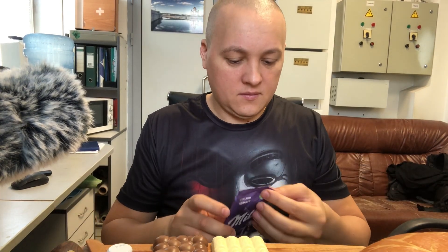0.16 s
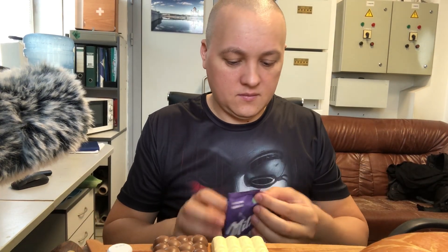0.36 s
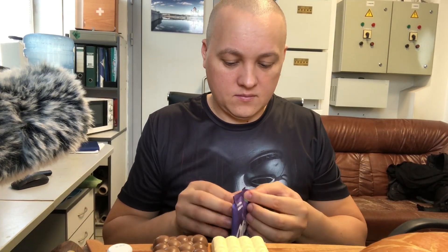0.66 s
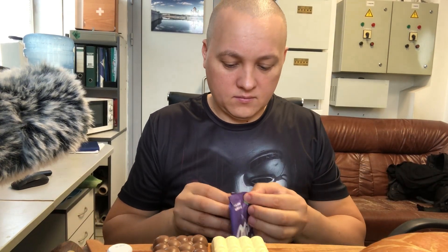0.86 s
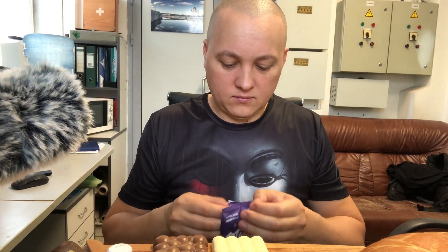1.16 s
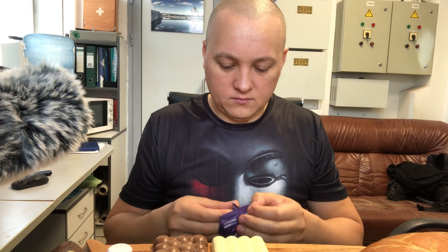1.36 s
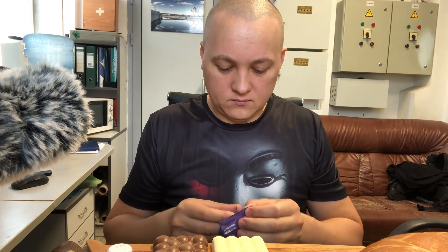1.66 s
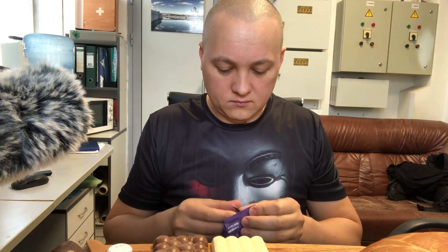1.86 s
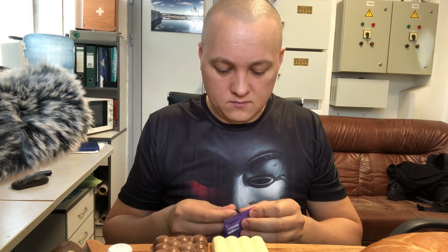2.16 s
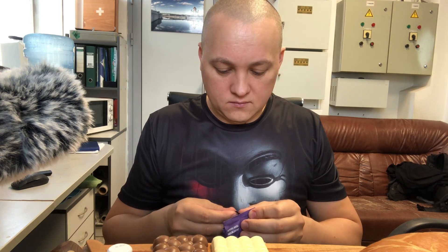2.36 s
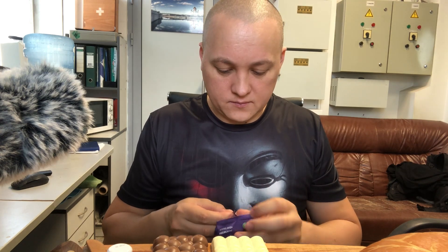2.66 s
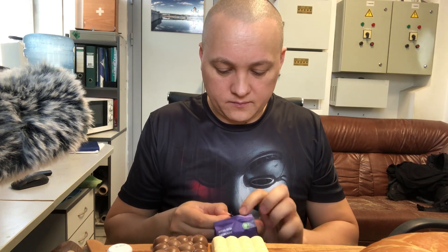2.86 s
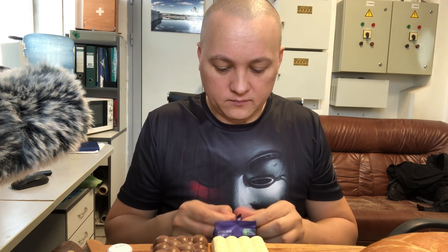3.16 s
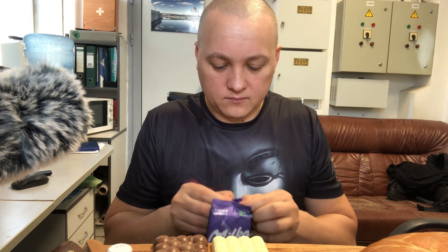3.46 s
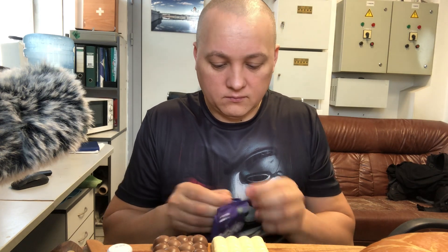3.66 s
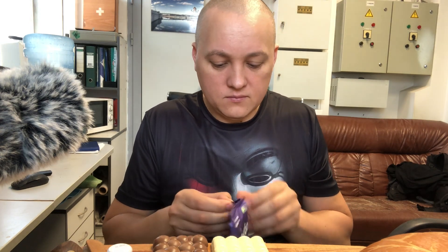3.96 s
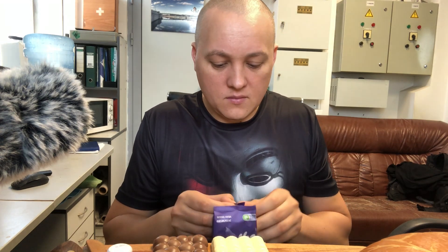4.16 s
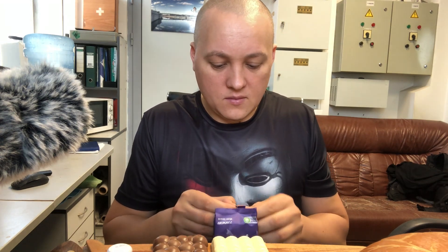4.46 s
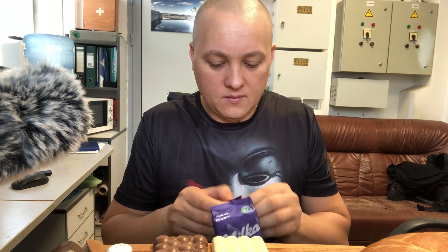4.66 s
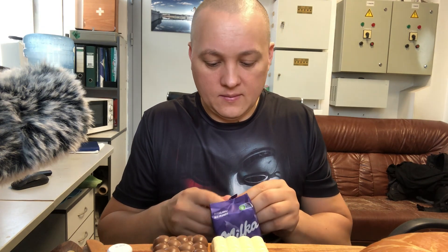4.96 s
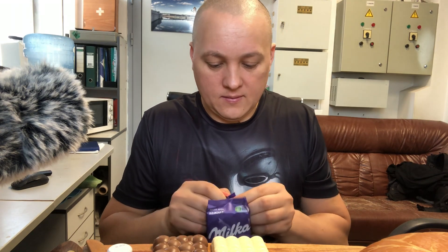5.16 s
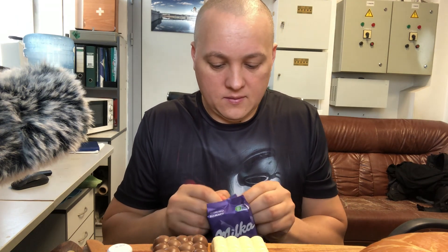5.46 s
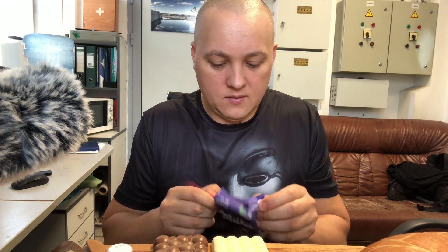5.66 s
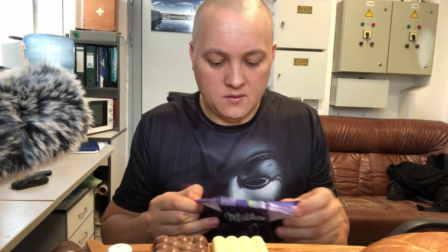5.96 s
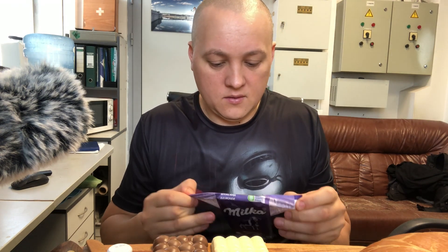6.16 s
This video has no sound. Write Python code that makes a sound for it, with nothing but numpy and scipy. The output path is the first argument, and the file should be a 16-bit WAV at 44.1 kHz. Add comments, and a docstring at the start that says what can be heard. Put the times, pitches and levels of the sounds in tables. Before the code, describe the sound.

A foil and paper chocolate wrapper crackles in irregular sharp snaps, then tears open in two dense bursts, over a low indoor machine hum.

```python
"""A foil and paper chocolate wrapper is opened by hand close to a microphone in a small furnished room.
Creases snap as shaped pulses with a crackling end, and the seam tears in two bursts of dense cracks.
Fingers rustle and swipe the film as filtered grains; the bar knocks as short pairs of decaying tones.
Machines hum as wavering multiples of their shaft rates, under the soft filtered noise of the air."""
import sys
import numpy as np
from scipy import signal
from scipy.fft import rfft, irfft
from scipy.io import wavfile
from scipy.ndimage import uniform_filter1d

SR = 44100
rng = np.random.default_rng(int(sys.argv[2]) if len(sys.argv) > 2 else 0)


def persist_wave(psi):
    """Save psi, clipped to +-1, as 16-bit WAV."""
    counts = np.round(np.clip(psi, -1, 1) * 32767).astype(np.int16)
    wavfile.write(sys.argv[1], SR, np.atleast_2d(counts).T)


N = 277830  # length in samples

# Fingers sliding on the film. Each row: time in seconds, level in dB; the level glides between rows.
RUSTLE_LEVELS = [(0, -60.5), (.3, -69.5), (.62, -74), (.75, -70), (1.0, -66), (1.3, -69.5), (1.8, -69.5),
                 (2.1, -72.5), (2.36, -81), (2.52, -67), (2.95, -67.5), (3.2, -72), (3.5, -64), (3.85, -77),
                 (4.1, -64), (4.5, -67), (5.05, -63.5), (5.2, -67), (5.62, -60.5), (5.7, -52.5), (6.0, -50),
                 (6.3, -71)]

# Humming machines. Each row: base rate in Hz, lowest heard multiple of it. The base rate is the shaft rate,
# except in the last row, where it is twice the shaft rate of a machine heard only through that tone.
SHAFTS = [(14.81, 3), (13.39, 5), (47.1, 1), (170.3, 1)]
# Each row: mean levels in dB of one machine's successive multiples, from its lowest heard one.
HUM_LEVELS_DB = [
    [-76.5, -87, -67, -66.5, -67.5, -81, -65, -55, -52.5, -63.5, -55.5, -92, -72, -71.5, -74, -72.5, -72,
     -73, -67.5],
    [-67.5, -80, -64.5, -74, -60.5, -75, -64, -65, -68, -54, -77, -76],
    [-72.5, -62.5, -75, -63.5],
    [-57],
]
OVERTONE_DB, OVERTONE_TOP_HZ = -78, 895  # mean peak level and upper limit of the faint hum overtones

# Spectrum of the air noise. Each row: frequency in Hz, relative density in dB per Hz.
AIR_SPECTRUM = [(25, -30), (60, -33), (170, -0.5), (260, -12.5), (470, -9), (830, -18.5), (1050, -17),
                (1200, -28.5), (1550, -26), (2330, -27), (3810, -31), (4860, -47.5), (5800, -32),
                (6600, -51), (14800, -57), (17000, -61)]
AIR_DB = -55  # level before the slight swelling
WHINE_HZ, WHINE_WIDTH_HZ, WHINE_DB = 3800, 130, -76  # narrow hiss of a small fan

# Crease snaps. Each row: start in seconds, crack level in dB over SNAP_S, crack pitch in Hz,
# breadth of the crack's peak in octaves, level in dB of the bar's low ring (both before film boosts and fold cut).
CREASE_SNAPS = [(0.0545, -35, 5800, 2.8, -38), (0.0775, -47, 3400, 1.2, -57),
                (0.1035, -35.5, 3700, 0.18, -40), (0.1181, -42, 4900, 1.8, -42),
                (0.1517, -34, 8900, 2.5, -40), (0.3625, -46, 6100, 0.1, -55), (0.3786, -45, 3700, 2.7, -47),
                (0.3847, -28, 7600, 0.59, -50), (0.6669, -48.5, 5430, 0.1, -74),
                (0.6712, -52, 4400, 0.8, -58), (0.7033, -48.5, 7000, 1.3, -68),
                (0.7816, -43.5, 5800, 0.1, -53), (0.7861, -43.5, 3220, 0.1, -45.5),
                (0.8975, -28, 4000, 2.1, -73), (0.9536, -46, 5200, 0.87, -60), (0.9805, -33, 4400, 1, -34),
                (1.0258, -42.5, 2420, 1.4, -58), (1.0702, -41.5, 3740, 0.082, -52),
                (1.1328, -53, 2300, 2.7, -46), (1.3391, -34.5, 5730, 2.5, -49),
                (1.3486, -35.5, 4340, 0.58, -42), (1.6907, -27, 6470, 0.1, -44.5),
                (1.816, -44.5, 2520, 0.5, -67), (1.9069, -37.5, 3400, 1.15, -38.5),
                (2.382, -38.5, 4600, 1.3, -44.5), (2.506, -33.5, 5200, 0.22, -40),
                (2.513, -39, 4600, 2.8, -42), (2.5195, -39.5, 4330, 0.1, -59),
                (2.6537, -49, 4200, 0.2, -43.5), (2.666, -45.5, 2300, 3.5, -52),
                (2.8068, -42.5, 2300, 1, -37.5), (2.8649, -38, 2400, 2.5, -40),
                (2.9207, -58, 3200, 0.2, -39), (2.9253, -36.5, 5070, 0.069, -43),
                (3.0087, -28.5, 7700, 1.4, -37.5), (3.0351, -48, 2300, 1.2, -43),
                (3.2727, -44, 3300, 0.1, -46.5), (3.3684, -36, 4000, 1.1, -38),
                (3.4184, -49, 2900, 0.5, -45), (3.4218, -38.5, 3000, 1.5, -40.5),
                (3.4317, -37, 5770, 1.4, -70), (3.4766, -40, 2400, 2.2, -35.5),
                (3.483, -41, 6100, 0.1, -39), (3.4906, -33.5, 2400, 2.1, -41),
                (3.5148, -46, 2400, 2, -44.5), (3.5509, -43.5, 2740, 0.1, -45),
                (3.5655, -34, 4500, 0.42, -53), (3.5685, -47, 3200, 0.32, -48),
                (3.6338, -32.5, 7840, 0.56, -49), (3.6795, -41.5, 3000, 1.2, -56),
                (3.7231, -42.5, 4900, 0.54, -59), (3.735, -48, 3400, 0.5, -44),
                (3.9275, -49.5, 4900, 1.2, -55), (3.9517, -42.5, 6600, 0.1, -59),
                (4.0467, -52, 7100, 0.1, -51), (4.091, -44, 4380, 1.1, -50), (4.0972, -47, 3900, 1.2, -45),
                (4.105, -42.5, 4400, 1.1, -48), (4.2023, -35.5, 3770, 1.8, -41.5),
                (4.3157, -42.5, 3570, 0.35, -67), (4.469, -39.5, 2700, 0.1, -42.5),
                (4.6163, -54, 2300, 2.5, -44), (4.6244, -32.5, 5200, 2.7, -45),
                (4.6669, -22.5, 3380, 3, -33), (4.7717, -34, 3480, 0.16, -33),
                (4.8826, -42, 5130, 0.18, -58), (4.9464, -32, 2300, 1, -36.5), (4.985, -48, 2300, 0.5, -53),
                (5.0126, -36.5, 4740, 0.1, -46), (5.0384, -45, 3900, 0.35, -50),
                (5.0523, -42, 4400, 1.1, -56), (5.0576, -28, 3500, 1.8, -36.5),
                (5.082, -41, 3700, 0.8, -47), (5.3617, -53.5, 6400, 0.1, -66), (5.422, -36, 2600, 2.5, -42),
                (5.434, -40, 6100, 1.2, -47), (5.441, -25, 2300, 2, -56), (5.446, -42, 4600, 0.35, -36),
                (5.4474, -24, 3600, 0.8, -36), (5.453, -26.5, 6100, 2.5, -26),
                (5.4585, -36, 5500, 2.5, -30), (5.4637, -24.5, 6100, 1.8, -29),
                (5.4755, -25, 3440, 0.1, -36), (5.4814, -26, 2350, 0.1, -38),
                (5.4885, -30, 4380, 0.99, -22), (5.4949, -28, 2320, 0.1, -22.5),
                (5.5006, -32, 2300, 1.4, -32), (5.5106, -28, 2300, 1.3, -31), (5.5162, -30, 3200, 1.5, -21),
                (5.698, -47, 5200, 1.8, -57), (5.705, -38, 4370, 1, -53), (5.724, -41, 3950, 0.1, -51),
                (5.735, -38, 3900, 0.081, -44), (5.747, -37, 3400, 0.8, -45),
                (5.7637, -17, 4230, 0.65, -29.5), (5.8095, -40, 2400, 2.5, -39),
                (5.8278, -24.5, 4400, 0.35, -44), (5.843, -23, 5630, 0.58, -34),
                (5.8502, -30, 2300, 1.2, -26), (5.8637, -37, 2600, 0.1, -29),
                (5.8672, -25, 2300, 0.86, -22), (5.8748, -28, 2300, 2.2, -31),
                (5.8773, -26, 4900, 0.97, -20), (5.8857, -29, 3000, 2.5, -32), (5.897, -41, 2900, 0.1, -31),
                (5.902, -28, 2530, 0.1, -34), (5.9108, -25.5, 3700, 3.4, -25),
                (5.9181, -19, 3920, 1.3, -29), (5.9221, -22.5, 3800, 0.11, -33),
                (5.9305, -21.5, 3900, 2.1, -28), (5.9353, -31, 6400, 2.5, -36),
                (6.0981, -59, 2300, 0.1, -48), (6.1462, -41.5, 2300, 3.1, -41.5),
                (6.1763, -45, 4200, 1.4, -55), (6.1952, -38.5, 3700, 4.5, -42.5)]
SNAP_S = .003  # span in seconds over which a snap's level is counted
CRACK_BELOW_DB, CRACK_ABOVE_DB = 11.5, 17.5  # fall per octave away from the pitch
RING_HZ, RING_BELOW_DB, RING_ABOVE_DB, RING_TOP_OCT = 1526, 6, 17.5, 0.068  # same shape for the low ring
# Dull snaps (more ring than crack) crackle longer; stretch is a log factor per dB, spread is random.
CRACKLE_DECAY_MS, DULL_STRETCH, CRACKLE_SPREAD = 2.31, 0.037, 0.34
# Loud snaps are shorter (log factor per dB above -42.5), those inside a tear longer (log factor).
LOUD_SHRINK, TEAR_STRETCH = 0.018, 0.67
# Small folds radiate little bass: extra fall per octave below this, for three octaves.
FOLD_CUT_HZ, FOLD_CUT_DB = 1290, 11.5
# Modes of the wrapped bar. Each row: frequency in Hz, width in Hz, mean boost in dB.
FILM_MODES = [(1545, 59, 1), (2550, 180, 6), (3790, 170, 3), (5680, 440, 3), (7600, 1100, 3),
              (9830, 1400, 5)]

# Quick swipes of a fingertip over the film. Each row: time of the peak in seconds, peak level in dB.
SWIPES = [(.28, -63.5), (.57, -66), (.77, -60), (1.67, -64), (1.866, -58), (3.0, -58), (3.49, -53),
          (3.935, -63), (4.093, -60), (4.42, -60.5), (4.61, -57), (5.28, -70)]
SWIPE_S, SWIPE_LO_HZ, SWIPE_HI_HZ = .013, 3430, 14200  # spread of the swell, band of the swish

# The bar knocks against the fingers. Each row: start in seconds, level in dB, pitch in Hz.
KNOCKS = [(2.653, -44, 720), (2.806, -47, 730), (2.865, -40, 638), (3.421, -38.5, 755), (4.201, -33, 650),
          (4.623, -40.5, 630), (4.77, -40.5, 805), (5.054, -44, 784), (5.47, -32, 695), (5.836, -26, 570),
          (5.875, -27.5, 426), (5.911, -26.5, 755), (6.145, -31.5, 497), (6.176, -38.5, 490),
          (6.195, -36, 516)]
KNOCK_T60_S = 0.043

# Seam tearing. Each row: start in seconds, attack in seconds, hold in seconds, level in dB,
# thump in dB above the body, treble drift in dB per second.
TEARS = [(5.421, 0.037, 0.058, -40.5, 2, -110), (5.805, 0.065, 0.063, -38, 5.5, 58)]
# Edges in Hz of the four tear bands: thump, body, film, hiss.
TEAR_EDGES_HZ = [330, 1000, 2000, 6000, 14000]
TEAR_RISE_DB, TEAR_FALL_DB_S = 20, 600  # swell during the attack, fall per second after the hold
TEAR_FILM_DB, TEAR_HISS_DB = 3.5, -2.5  # against the body, before the treble drift

# Room decay. Each row: frequency in Hz, time in seconds to fall 60 dB.
ROOM_T60 = [(500, 0.34), (2000, 0.38), (6000, 0.36), (16000, 0.17)]
ROOM_DB = -12  # energy of the tail

# Resonances of the microphone housing. Each row: frequency in Hz, width in Hz, level in dB of the added ring.
HOUSING = [(810, 375, -7), (1581, 307, 0.5), (2704, 180, -5), (3810, 340, -5.5), (5750, 500, -7),
           (8040, 1050, -5.5), (9540, 400, -22), (14400, 790, -4)]
TOP_HZ = 15900  # steep upper limit


def undb(db):
    """Decibels to gain."""
    return 10 ** (np.asarray(db) / 20)


def level(x, db):
    """Scale to an rms level in dB."""
    return x * undb(db) / np.sqrt(np.mean(x ** 2))


def band(x, lo_hz, hi_hz, order=2):
    """Causal band-pass along the last axis."""
    return signal.sosfilt(signal.butter(order, [lo_hz, hi_hz], "bandpass", fs=SR, output="sos"), x)


def walk(rate):
    """Random levels held 1 / rate seconds and slewed twice; spread near 1."""
    hold = int(SR / rate)
    steps = np.repeat(rng.standard_normal(N // hold + 1), hold)
    return 1.207 * uniform_filter1d(uniform_filter1d(steps, hold), hold)[:N]


def grains(rate, spread_db):
    """Tiny random cracks, rate per second, mostly small with a few large ones; rms 1."""
    hit = rng.random(N) < rate / SR
    sign = rng.choice([-1, 1], N)
    return level(hit * sign * undb(spread_db * rng.exponential(size=N)), 0)


def scatter(times, sounds):
    """Place each short sound at its time."""
    out = np.zeros(N + sounds.shape[1])
    for start, sound in zip((times * SR).astype(int), sounds):
        out[start:start + len(sound)] += sound
    return out[:N]


def rustle():
    """Skin on film: a fine bright rub with small smeared ticks in three colours."""
    s, db = np.transpose(RUSTLE_LEVELS)
    sound = level(band(grains(6700, 1.4), 1300, 8500, order=1), -4)
    smear = rng.standard_normal(200) * np.exp(-np.arange(200) / SR / 0.00056)
    for lo, hi, tick_db in [(1170, 3600, -4.5), (2800, 4600, -7.5), (5900, 10200, -10.5)]:
        ticks = np.convolve(grains(160, 1.7), smear)[:N]
        sound = sound + level(band(ticks, lo, hi), tick_db)
    return sound * undb(np.interp(np.arange(N) / SR, s, db))


def hum():
    """Multiples of each shaft rate are tones; shaft speed drifts and the strong tones waver."""
    out = 0
    for (hz, first), levels in zip(SHAFTS, HUM_LEVELS_DB):
        turn = 2 * np.pi * np.cumsum(hz * (1 + 0.001422 * walk(0.804))) / SR
        for multiple, db in enumerate(levels, first):
            gain = np.sqrt(2) * undb(db + 2.25 * walk(1.543))
            out = out + gain * np.sin(multiple * turn + 2 * np.pi * rng.random())
        # faint uneven overtones continue above the strong ones, every second multiple
        for multiple in range(first + len(levels), int(OVERTONE_TOP_HZ / hz), 2):
            gain = undb(OVERTONE_DB + 3.4 * rng.standard_normal())
            out = out + gain * np.sin(multiple * turn + 2 * np.pi * rng.random())
    return out


def air():
    """Steady ventilation and microphone hiss, swelling slightly, and a thin fan whine."""
    hz, db = np.transpose(AIR_SPECTRUM)
    f = np.maximum(np.fft.rfftfreq(N, 1 / SR), 1)
    colour = undb(np.interp(np.log(f), np.log(hz), db))
    noise = irfft(rfft(rng.standard_normal(N)) * colour, N)
    lo, hi = WHINE_HZ - WHINE_WIDTH_HZ / 2, WHINE_HZ + WHINE_WIDTH_HZ / 2
    whine = level(band(rng.standard_normal(N), lo, hi, order=1), WHINE_DB)
    return whine + level(noise, AIR_DB) * undb(0.85 * walk(3.3))


def causal(db):
    """Minimum-phase spectra with the given magnitudes, by folding the cepstrum."""
    ceps = irfft(db * np.log(10) / 20)
    half = ceps.shape[1] // 2
    ceps[:, 1:half] *= 2
    ceps[:, half + 1:] = 0
    return np.exp(rfft(ceps))


def hump(hz, centre_hz, below_db, above_db, top_oct, db):
    """Power spectrum of a rounded peak that falls by set dB per octave, holding level db over SNAP_S."""
    octs = np.log2((hz + 1) / centre_hz)
    fall_db = np.where(octs < 0, below_db, above_db) * (np.hypot(octs, top_oct) - top_oct)
    power = undb(-fall_db) ** 2
    return power * undb(db) ** 2 * SNAP_S * SR * (len(hz) - 1) / power.sum(axis=-1, keepdims=True)


def film(hz, count):
    """Resonance boosts in dB for each snap; every fold shifts the modes and rings them differently."""
    chance, boost = rng.standard_normal((count, len(FILM_MODES), 2)), 0
    for k, (mode_hz, width, db) in enumerate(FILM_MODES):
        centre = mode_hz * (1 + 0.048 * chance[:, k, :1])
        peak_db = db * (1 + 0.18 * chance[:, k, 1:])
        boost = boost + peak_db / (1 + (2 * (hz - centre) / width) ** 2)
    return boost


def snaps():
    """Each crease flips with one sharp pulse, then crackles out within milliseconds.
    Returns the sound at the microphone and the smoother one radiated to the walls."""
    s, crack_db, crack_hz, breadth, ring_db = np.transpose(CREASE_SNAPS)
    t = np.arange(2048) / SR
    hz = np.fft.rfftfreq(len(t), 1 / SR)
    shape = (len(s), len(t))
    after = rng.standard_normal(shape) * (rng.random(shape) < .4)

    tearing = sum((s > start) & (s < start + attack + hold) for start, attack, hold, *_ in TEARS)
    stretch = DULL_STRETCH * (ring_db - crack_db) - LOUD_SHRINK * (crack_db + 42.5) + TEAR_STRETCH * tearing
    stretch = stretch + CRACKLE_SPREAD * rng.standard_normal(len(s))
    decay_ms = CRACKLE_DECAY_MS * np.exp(stretch)[:, None]
    push = 0.59 / 1.5 * decay_ms * after * np.exp(-t * 1000 / decay_ms)
    push += 0.054 * after * np.exp(-t / 0.012)  # the sheet keeps trembling a little longer
    push[:, 0] = -2.14  # the flip itself

    # the crackle sets the timing only; its broad colour is evened out
    crackle = rfft(push)
    crackle /= np.sqrt(uniform_filter1d(np.abs(crackle) ** 2, size=140, axis=1))

    # a bright crack at the crease's own pitch over the low ring of the bar
    crack = hump(hz, crack_hz[:, None], CRACK_BELOW_DB, CRACK_ABOVE_DB, breadth[:, None], crack_db[:, None])
    ring = hump(hz, RING_HZ, RING_BELOW_DB, RING_ABOVE_DB, RING_TOP_OCT, ring_db[:, None])
    slope = 10 * np.log10(crack + ring + 1e-12)
    slope += FOLD_CUT_DB * np.minimum(np.log2((hz + 1) / FOLD_CUT_HZ), 0).clip(-3)
    colour = causal(slope + film(hz, count=len(s)) - 2.5)

    near = scatter(s, irfft(colour * crackle))
    # the walls hear many directions at once, so less of the crackle's fine colour
    radiated = scatter(s, irfft(colour * np.abs(crackle) ** 0.5))
    return near, radiated


def swipes():
    """A fingertip brushing the film: short bright swishes of grains that swell and fade."""
    t = np.arange(N) / SR
    swell = sum(undb(db) * np.exp(-.5 * ((t - s) / SWIPE_S) ** 2) for s, db in SWIPES)
    return swell * level(band(grains(5000, 1.2), SWIPE_LO_HZ, SWIPE_HI_HZ, order=1), 0)


def knocks():
    """A soft blow rings a short, dull close pair of modes of the bar."""
    s, db, hz = np.transpose(KNOCKS)[:, :, None]
    t = np.arange(4096) / SR
    pair = np.sin(2 * np.pi * hz * t) + 0.33 * np.sin(2 * np.pi * 1.114 * hz * t)
    soft_start = np.clip(t / 0.00057, 0, 1)
    ring = pair * np.exp(-np.log(1000) * t / KNOCK_T60_S) * soft_start
    return scatter(s[:, 0], undb(db) * ring)


def tears():
    """The glued seam lets go in a dense stick-slip run of cracks that shake the whole bar."""
    t, out = np.arange(N) / SR, 0
    cracks = grains(1200, 2.4)
    for start, attack, hold, db, thump_db, drift in TEARS:
        since = t - start - attack  # seconds from the end of the attack
        rise_db = TEAR_RISE_DB * np.minimum(since / attack, 0)
        fall_db = TEAR_FALL_DB_S * np.maximum(since - hold, 0)
        body_db = db + rise_db - fall_db
        treble_db = drift * np.clip(since, -attack, hold)
        parts_db = thump_db, 0, TEAR_FILM_DB + treble_db, TEAR_HISS_DB + treble_db
        for lo, hi, part_db in zip(TEAR_EDGES_HZ, TEAR_EDGES_HZ[1:], parts_db):
            part = level(band(cracks, lo, hi), -1)  # every part sits 1 dB under its set level
            out = out + part * undb(body_db + part_db) * (t > start)
    return out


def room(x):
    """Diffuse tail of decaying noise bands that fades in over 17 ms; the top treble dies first."""
    t = np.arange(int(.6 * SR)) / SR
    hz, t60 = np.transpose(ROOM_T60)
    tail = 0
    for f in 300 * 2 ** np.arange(0, 6, .5):  # half-octave bands
        band_t60 = np.interp(np.log(f), np.log(hz), t60)
        noise = band(rng.standard_normal(len(t)), f / 1.215, f * 1.198)
        tail = tail + noise * np.exp(-np.log(1000) * t / band_t60)
    tail *= np.clip(t / 0.017, 0, 1)
    return signal.fftconvolve(x, tail * undb(ROOM_DB) / np.sqrt(np.sum(tail ** 2)))[:N]


def scene():
    """Wrapper in the room over hum and air."""
    near, radiated = snaps()
    handling = tears() + rustle() + swipes() + knocks()
    return (near + handling + room(radiated + handling) + hum() + air())[None]


def record(dry):
    """The microphone housing adds its resonances to the sound; the top is cut steeply."""
    rings = 0
    for hz, width, db in HOUSING:
        b, a = signal.iirpeak(hz, hz / width, fs=SR)
        rings = rings + undb(db) * signal.lfilter(b, a, dry)
    steep_cut = signal.ellip(10, .2, 80, TOP_HZ, fs=SR, output="sos")
    return signal.sosfilt(steep_cut, dry + rings)


dry = scene()
out = record(dry)
persist_wave(out)
```